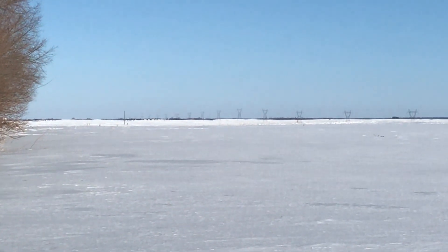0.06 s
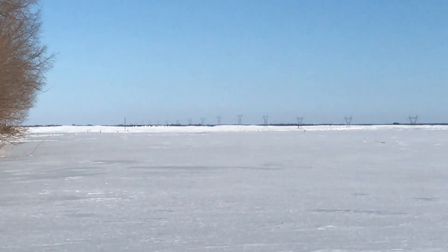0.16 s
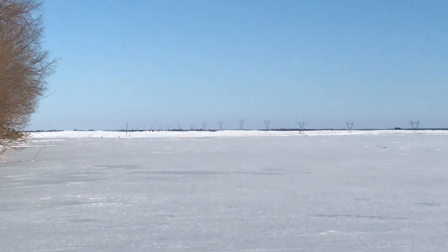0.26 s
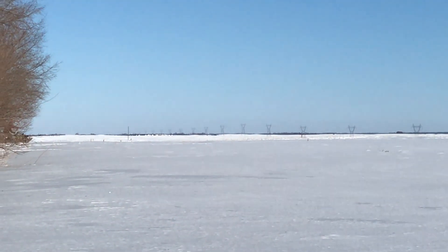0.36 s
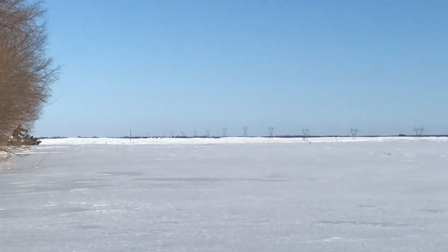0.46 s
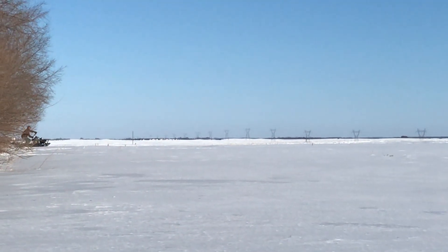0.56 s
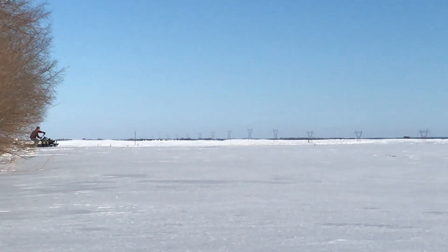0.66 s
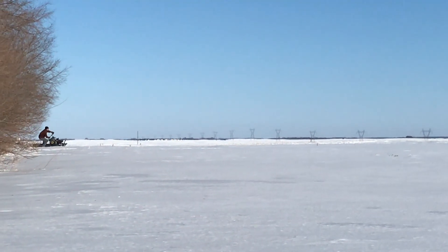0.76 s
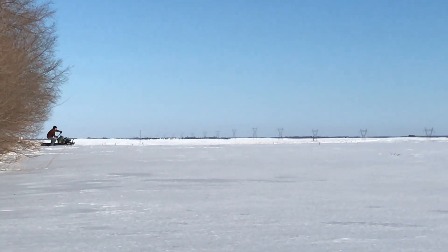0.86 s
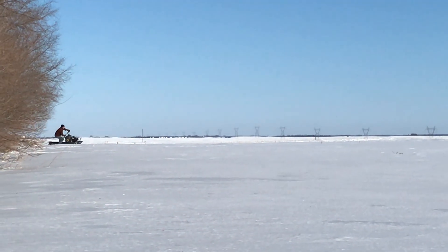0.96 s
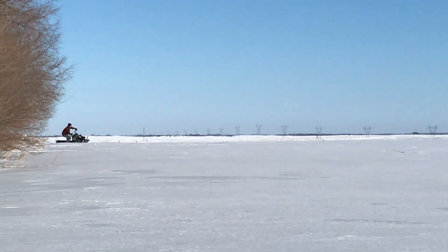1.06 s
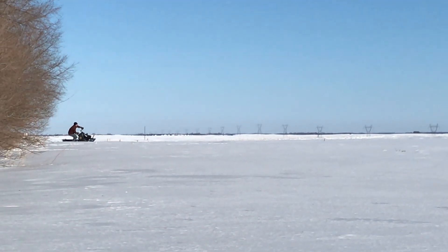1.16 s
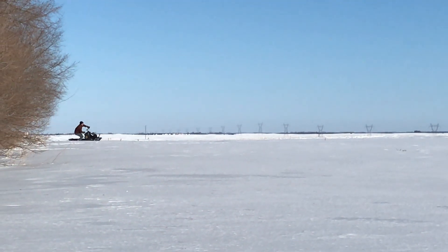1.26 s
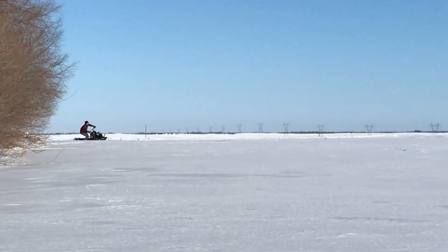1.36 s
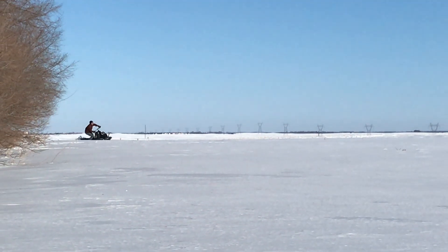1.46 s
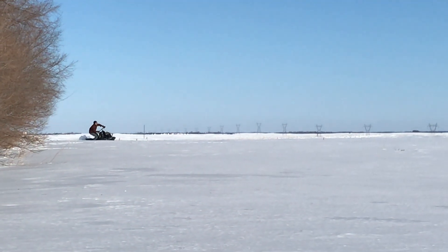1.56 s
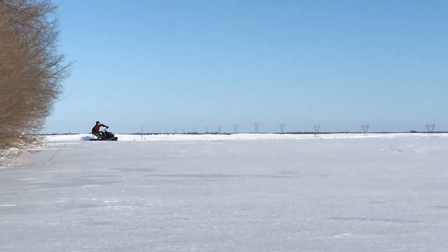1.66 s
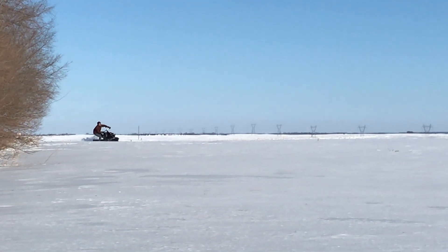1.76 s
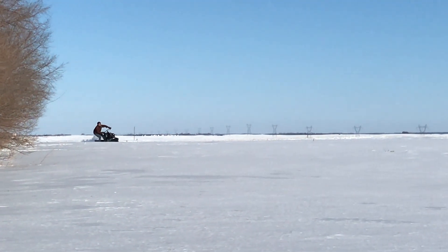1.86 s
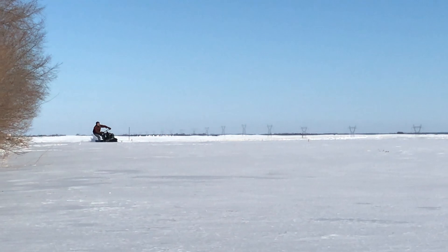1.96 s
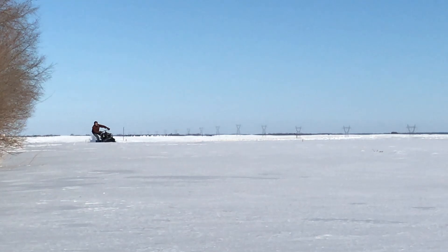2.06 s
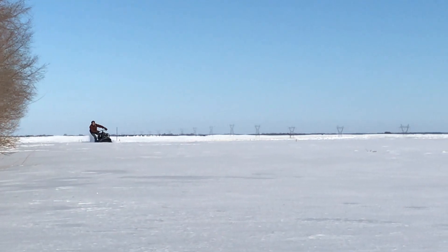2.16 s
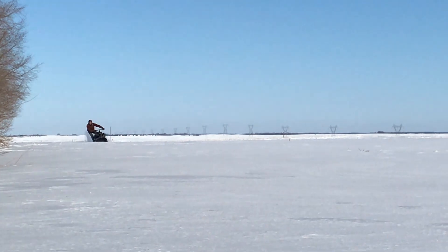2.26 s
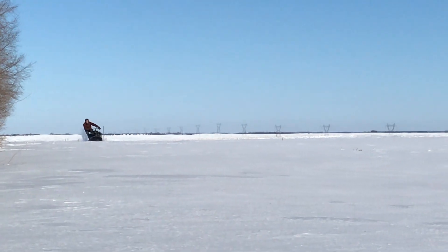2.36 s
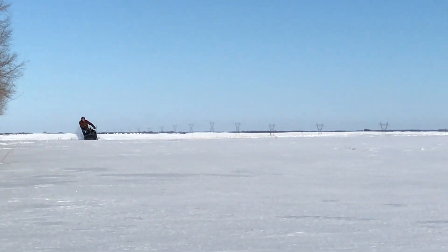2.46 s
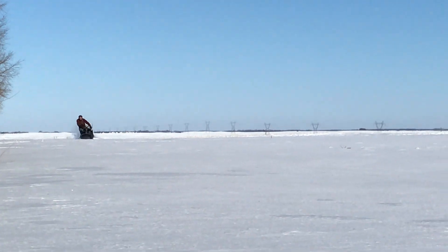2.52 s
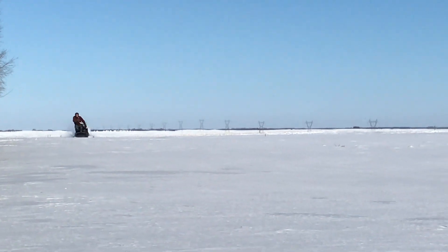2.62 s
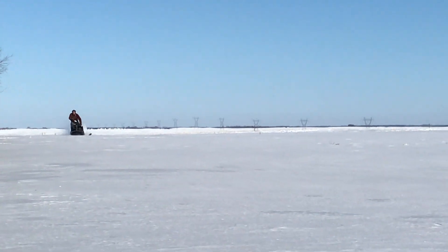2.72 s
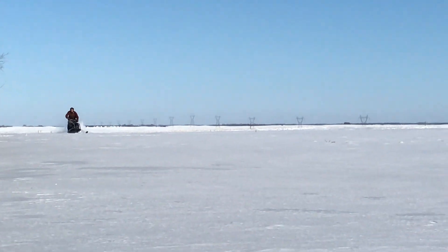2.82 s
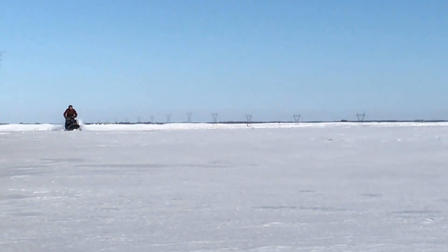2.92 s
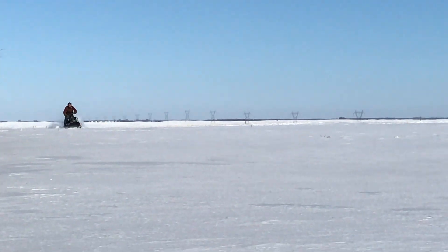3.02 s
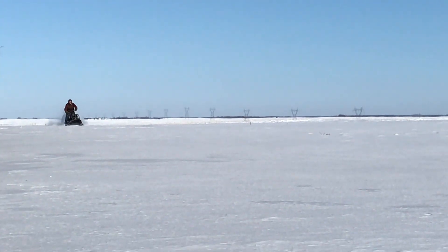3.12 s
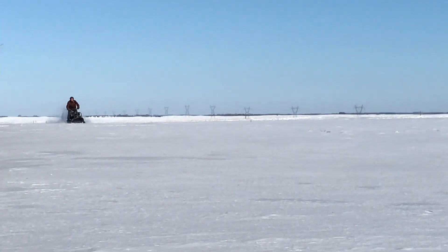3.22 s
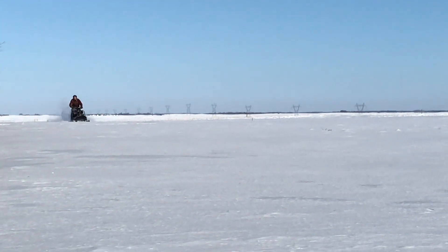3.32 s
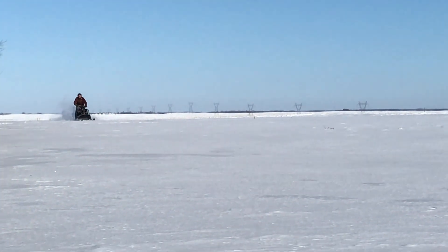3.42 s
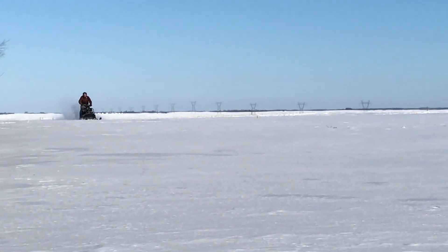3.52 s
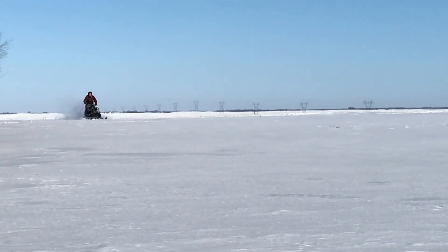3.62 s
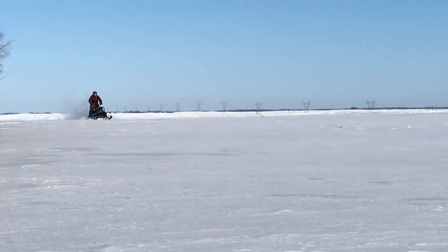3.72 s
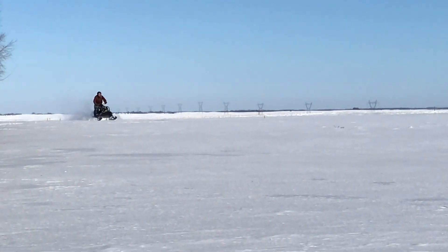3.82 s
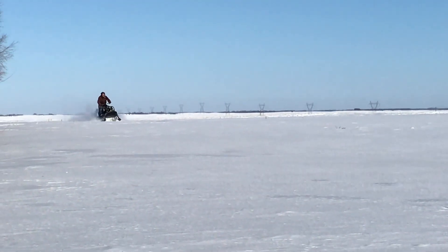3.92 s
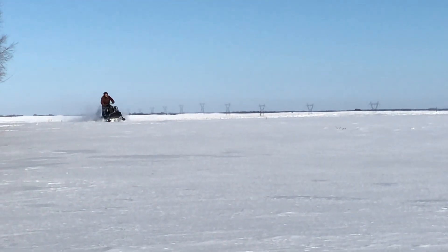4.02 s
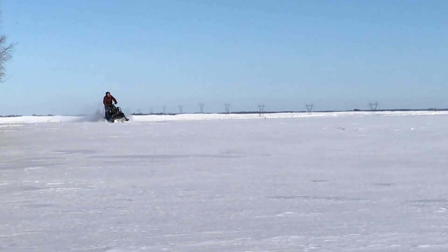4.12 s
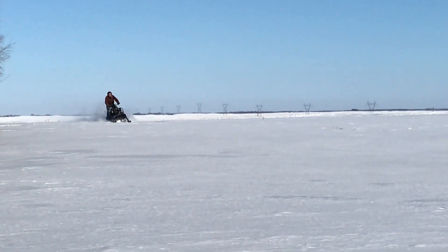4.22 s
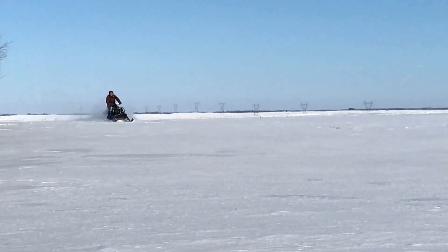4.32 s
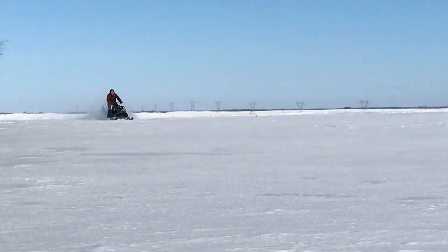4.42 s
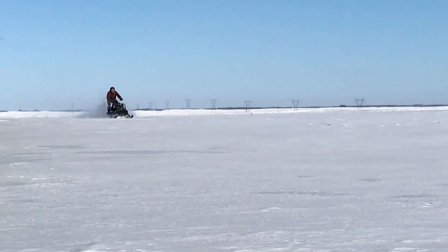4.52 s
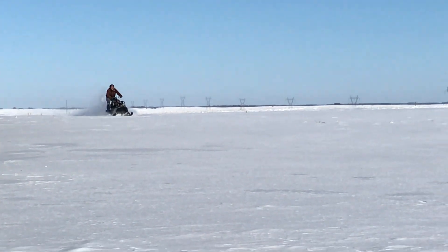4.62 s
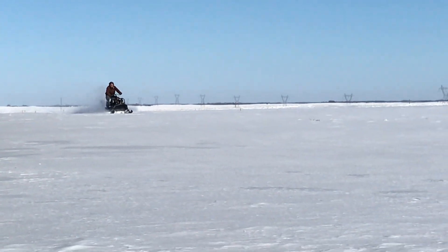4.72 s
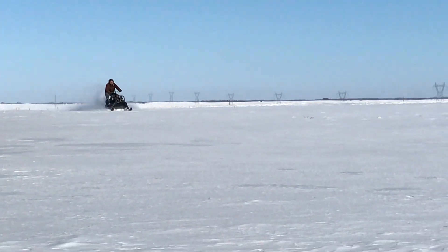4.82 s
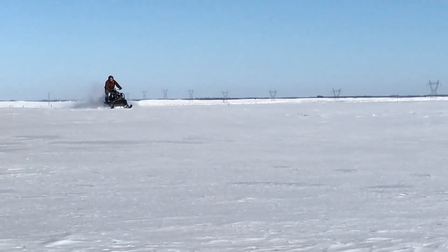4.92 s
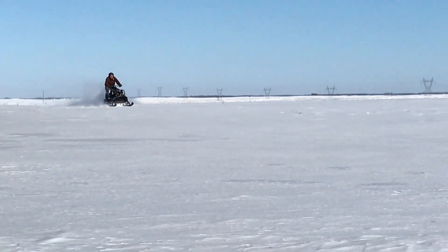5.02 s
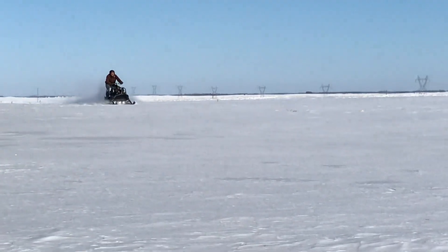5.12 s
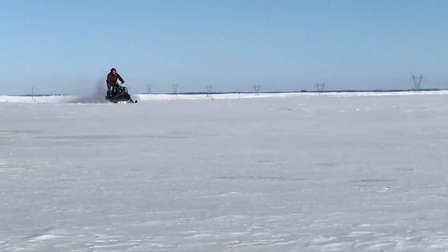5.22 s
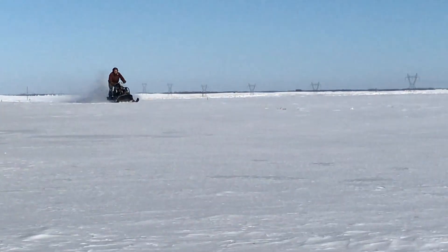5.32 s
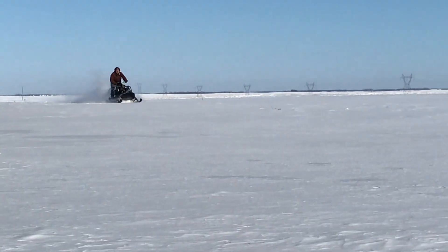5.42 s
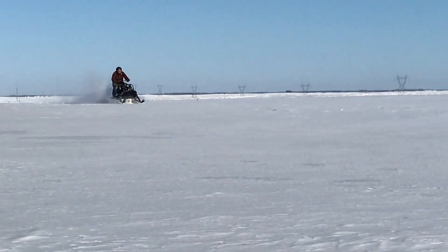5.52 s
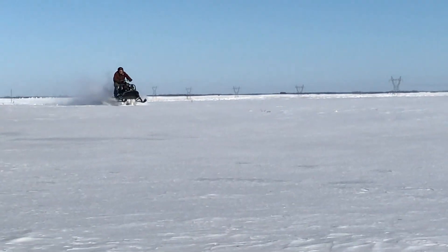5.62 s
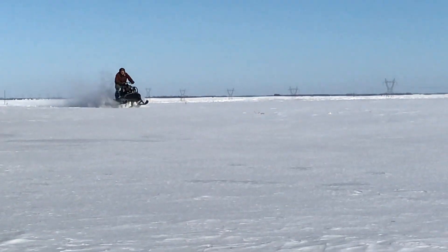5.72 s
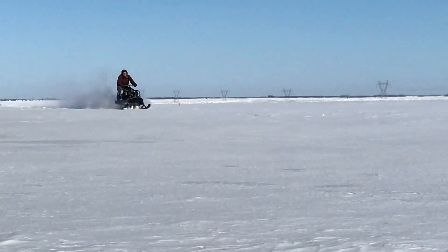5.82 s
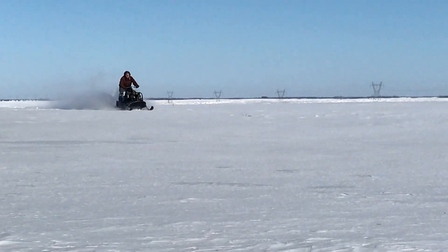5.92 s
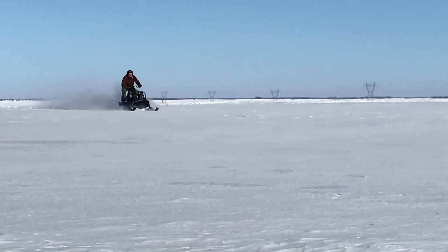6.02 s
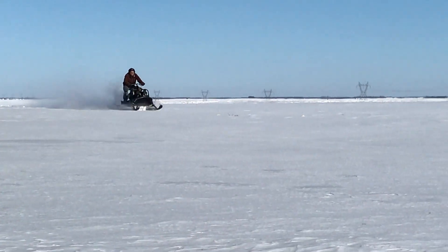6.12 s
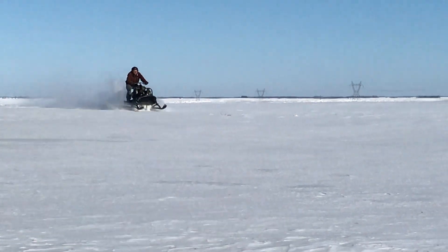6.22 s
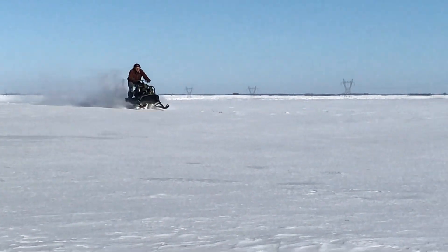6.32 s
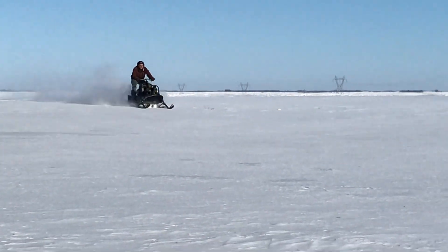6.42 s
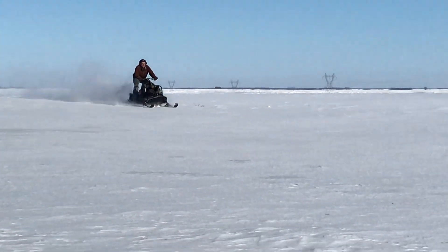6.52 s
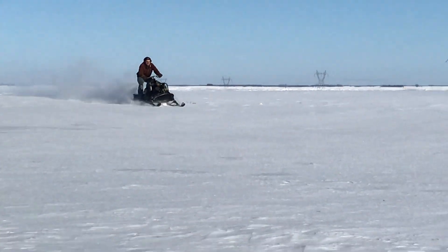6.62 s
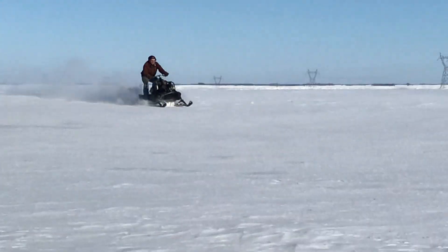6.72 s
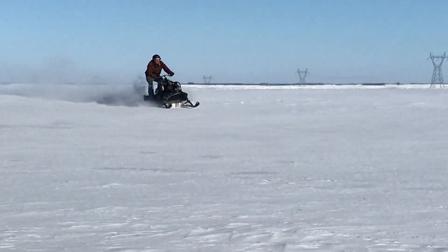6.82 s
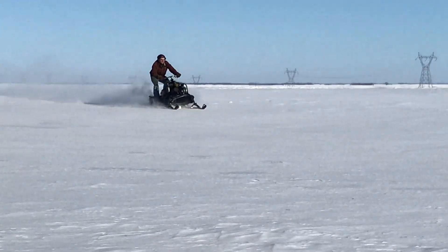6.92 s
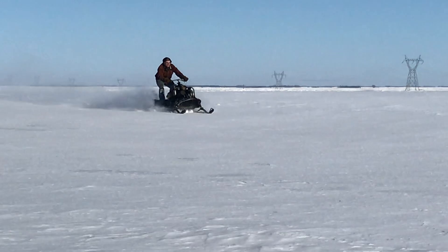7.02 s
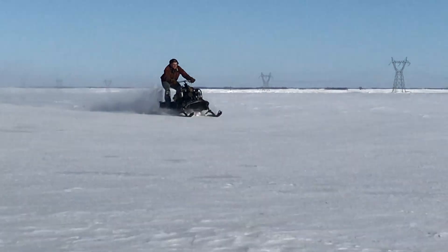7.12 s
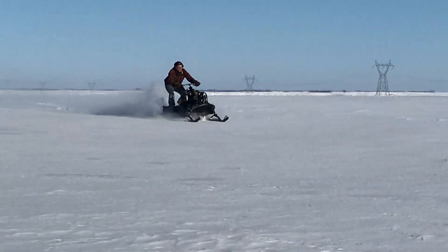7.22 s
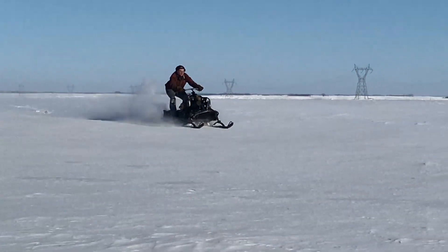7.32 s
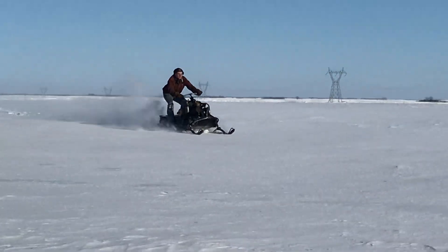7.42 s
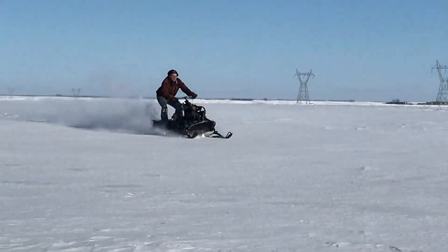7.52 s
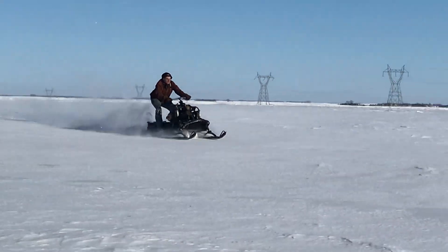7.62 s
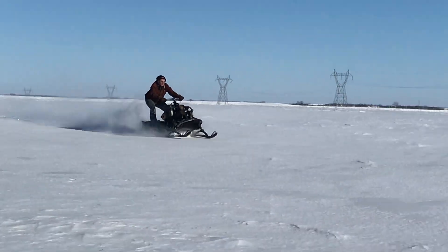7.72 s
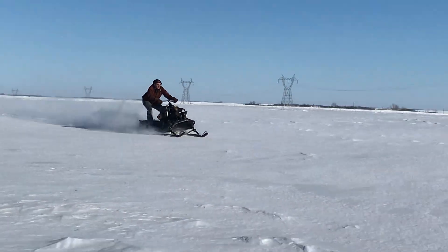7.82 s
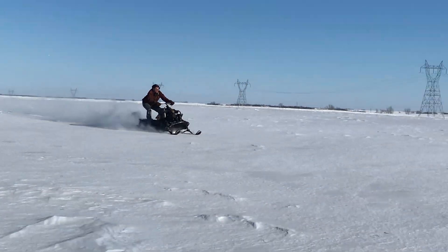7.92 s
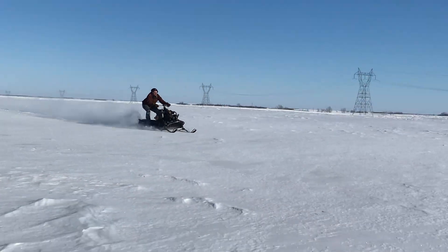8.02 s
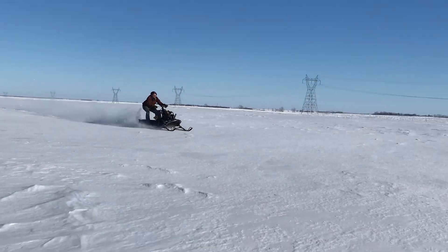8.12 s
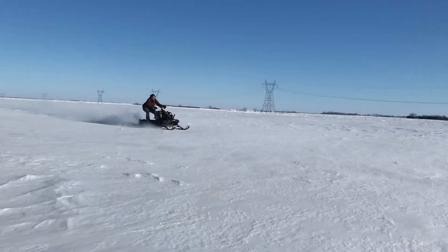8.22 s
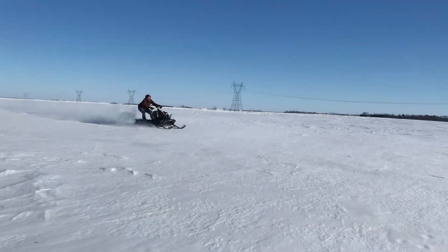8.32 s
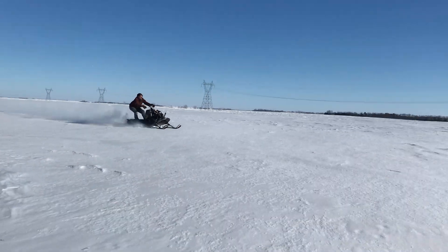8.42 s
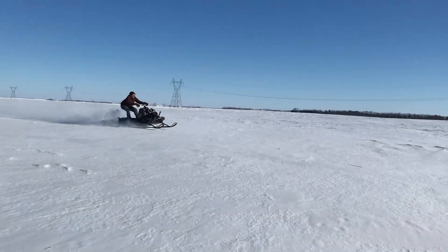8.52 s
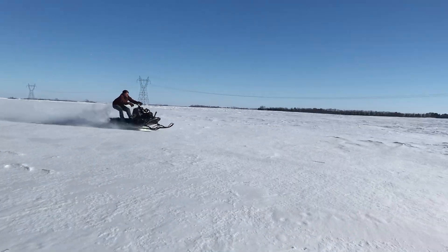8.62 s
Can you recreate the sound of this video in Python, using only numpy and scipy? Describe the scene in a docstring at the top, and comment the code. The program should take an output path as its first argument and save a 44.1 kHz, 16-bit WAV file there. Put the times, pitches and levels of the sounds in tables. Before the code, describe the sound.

Far-off snowmobile engine putters unevenly, revs into a buzzing drone, then swells steadily nearer to a harsh, bright two-stroke roar outdoors.

```python
"""Snowmobile sweeping closer

A twin-cylinder two-stroke snowmobile chugs far off on a snowy field, pulls away and sweeps closer.
Exhaust pulses and blown gas ring the pipe and hood; at full throttle one firing in four nearly drops out.
Sine tones carry the low drone and swelling overtones; short noise bursts make the chugs, pings and ticks.
A small mono microphone hears it in the open, over a faint breeze of filtered noise."""
import sys
import numpy as np
from scipy import signal
from scipy.fft import rfft, irfft
from scipy.io import wavfile
from scipy.ndimage import uniform_filter1d

SR = 44100
rng = np.random.default_rng(int(sys.argv[2]) if len(sys.argv) > 2 else 0)


def file_out(sig):
    """Save sig as 16-bit WAV at sys.argv[1]."""
    # one column per channel
    cols = np.atleast_2d(sig).T
    # limit, then scale
    lim = np.clip(cols, -1, 1)
    pcm = np.round(lim * 32767).astype(np.int16)
    wavfile.write(sys.argv[1], SR, pcm)


N = 381906
T = np.arange(N) / SR


def amp(db):
    """Turns decibels into a linear gain."""
    return 10 ** (np.asarray(db) / 20)


def evened(x):
    """Scales the whole signal to rms 1."""
    return x / np.sqrt(np.mean(x ** 2) + 1e-20)


def steadied(x):
    """Divides out slow changes of level."""
    return x / np.sqrt(uniform_filter1d(x ** 2, 8192) + 1e-9)


def curves(rows):
    """Joins table rows by straight lines, one array a column."""
    s, *columns = np.transpose(rows)
    return [np.interp(T, s, column) for column in columns]


def read(points, hz):
    """Reads a spectrum table at the given pitches, along a log pitch axis."""
    f, value = np.transpose(points)
    return np.interp(np.log(hz + 1), np.log(f + 1), value)


def wander(hz):
    """Slow chance of rms 1, up to about hz."""
    rolloff = 1 + (np.fft.rfftfreq(N, 1 / SR) / hz) ** 4
    return evened(irfft(rfft(rng.standard_normal(N)) / rolloff, N))


def clicks(s, size):
    """An impulse of the given size at each time."""
    out = np.zeros(N + SR)
    np.add.at(out, np.round(np.asarray(s) * SR).astype(int), size)
    return out[:N]


def puffed(train, rise_s, fall_s):
    """Each impulse becomes a quick swell that dies away."""
    t = T[:4096]
    swell = (1 - np.exp(-t / rise_s)) * np.exp(-t / fall_s)
    return signal.oaconvolve(train, swell)[:N]


def twice_peaked(x, hz, width_hz):
    """One resonance passed twice, for steeper sides."""
    b, a = signal.iirpeak(hz, hz / width_hz, fs=SR)
    return signal.lfilter(b, a, signal.lfilter(b, a, x))


def ring(x, hz, width_hz):
    """One steep resonance at a steady level of 1."""
    return steadied(twice_peaked(evened(x), hz, width_hz))


# broad spectrum between the rings: (pitch_hz, relative density_db per Hz)
BLAST_SPECTRUM = [(220, -47), (380, -11.5), (1220, -8.5), (1360, -1.5), (1590, -4), (1850, -7),
                  (2530, -4.5), (3500, 3.5), (3850, 1), (4220, 2), (5170, -1.5), (6230, -9), (7160, -18),
                  (10400, -24.5), (15600, -28.5)]


def through_pipe(x, rings, ring_db):
    """Causal filter: narrow rings standing over the broad blast."""
    hz = np.fft.rfftfreq(8192, 1 / SR)
    power = amp(read(BLAST_SPECTRUM, hz)) ** 2
    for f, width_hz, db in rings:
        power = power + amp(db + ring_db) ** 2 / (1 + (2 * (hz - f) / width_hz) ** 2) ** 2
    log_gain = np.log(np.r_[power, power[-2:0:-1]]) / 2
    # minimum phase: no ringing ahead of the pulse
    minimum_phase = np.exp(np.conj(signal.hilbert(log_gain)))
    taps = np.fft.ifft(minimum_phase).real[:4096]
    return evened(signal.oaconvolve(x, taps)[:N])


# lower edges of growl, howl, rasp, fizz and top: (edge_hz)
BAND_FLOORS_HZ = [400, 1000, 2800, 7000, 10300]


def bands(x):
    """Splits x at the band edges with soft crossovers; each part keeps a steady level of 1."""
    hz = np.fft.rfftfreq(N, 1 / SR)
    above = [1 / (1 + (edge / (hz + 1)) ** 12) for edge in BAND_FLOORS_HZ] + [0]
    spectrum = rfft(x)
    return [steadied(irfft(spectrum * (a - b), N)) for a, b in zip(above, above[1:])]


def scattered(pulses, spread_s, drift_hz, count):
    """Hood, rider and snow smear each pulse into a cluster that drifts, at steady strength, as the sled moves."""
    t, out = T[:600], 0
    weights = np.array([wander(drift_hz) for _ in range(count)])
    steady_weights = weights * np.sqrt(count / ((weights ** 2).sum(axis=0) + .1))
    for weight in steady_weights:
        cluster = rng.standard_normal(len(t)) * np.exp(-t / spread_s)
        out = out + weight * signal.oaconvolve(pulses, cluster / np.linalg.norm(cluster))[:N]
    return out


PATCH_DB, PATCH_HZ, PATCH_S, PATCH_FROM_HZ = 2.0, 900, .08, 6500


def patchy(x):
    """The treble shimmers: random patches of pitch and time grow louder or softer."""
    hz, _, z = signal.stft(x, SR, nperseg=512, noverlap=384)
    bins = max(round(PATCH_HZ * 512 / SR), 1)
    frames = max(round(PATCH_S * SR / 128), 1)
    field = rng.standard_normal(z.shape)
    for _ in range(2):
        field = uniform_filter1d(uniform_filter1d(field, bins, axis=0), frames, axis=1)
    depth_db = PATCH_DB * hz ** 2 / (hz ** 2 + PATCH_FROM_HZ ** 2)
    gain = amp(depth_db[:, None] * evened(field))
    return signal.istft(z * gain, SR, nperseg=512, noverlap=384)[1][:N]


# strength of each firing in the cycle when the dropout is at full depth: (level_db)
FOUR_FIRINGS_DB = [0, 2.5, -1, -14]
CYCLE = len(FOUR_FIRINGS_DB)
# ringing of pipe and hood when close: (pitch_hz, width_hz, relative level_db)
PIPE_NEAR = [(723, 4, -5), (1000, 32, -3), (1224, 21, 0), (1838, 137, 0.5), (2110, 300, -4.5),
             (2680, 160, -9.5), (2430, 87, -6.5), (4280, 330, 8), (5004, 190, 9), (5350, 590, 3),
             (7050, 290, -10.5), (11800, 200, -32)]
# ringing of pipe and hood, side on: (pitch_hz, width_hz, relative level_db)
PIPE_FAR = [(852, 105, -3), (1125, 63, -7.5), (1828, 97, -4), (2220, 89, 2), (2626, 46, -1),
            (2640, 150, -0.5), (3360, 200, 0.5), (4150, 200, 5.5), (4570, 210, 6), (3600, 480, -8),
            (8810, 1340, -24)]
# two rings that swing in and out: (pitch_hz, width_hz, clean pulse share 0-1)
TURNING_RINGS = [(1384, 49, 0.91), (3570, 280, 0.92)]
# each pulse returns from the pipe's end, more so at full throttle
PIPE_ECHO_S, PIPE_ECHO, PIPE_ECHO_LOADED = .002865, 0.66, 0.077
# the firing (0-3) that cracks hardest, and its extra snap in the blast and in the high ring
STRONG_PLACE, STRONG_CRACK, STRONG_CRACK_RING = 1, 1.0, 10.0
CLEANER_LOADED = .2  # the pulses sharpen at full throttle


def exhaust(turns, chugging, dropped, clean, near, bands_db, rings_db):
    """A sharp pulse and a puff of gas at every firing, rung through the pipe."""
    at = np.flatnonzero(np.diff(np.floor(turns))) + 1
    late, size = rng.standard_normal((len(at), 2)).T
    place = np.floor(turns[at]).astype(int) % CYCLE
    strength = amp(dropped[at] * np.array(FOUR_FIRINGS_DB)[place] + 0.32 * size)
    s = at / SR + 1.2e-5 * late
    echo = (PIPE_ECHO + PIPE_ECHO_LOADED * dropped[at]) * strength
    firings = clicks(s, strength) + clicks(s + PIPE_ECHO_S, echo)
    gas = (0.023 + evened(puffed(firings, 0.0012, 0.0028))) * rng.standard_normal(N)
    pulses = firings + 0.52 * scattered(firings, 0.0024, 5.0, count=3)

    # around a dropped firing each of the four burns in its own, repeating way
    for k in range(CYCLE):
        own_firings = clicks(s, strength * (place == k))
        pulses += 0.55 * dropped * scattered(own_firings, 0.0024, 1.5, count=2)

    crack = clicks(s, dropped[at] * strength * (place == STRONG_PLACE))
    pulses, cracks = pulses + STRONG_CRACK * crack, pulses + STRONG_CRACK_RING * crack
    out = 0
    for db, drive, (hz, width_hz, share) in zip(rings_db, [pulses, cracks], TURNING_RINGS):
        clean_ring = np.sqrt(min(share, 1)) * ring(drive, hz, width_hz)
        gas_ring = np.sqrt(max(1 - share, 0)) * ring(gas, hz, width_hz)
        out = out + amp(db - 6.5) * (clean_ring + gas_ring)

    near = np.clip(near, 0, 1)
    near_gain, far_gain = np.sqrt(near), np.sqrt(1 - near)
    pulses = near_gain * through_pipe(pulses, PIPE_NEAR, 8.0) + far_gain * through_pipe(pulses, PIPE_FAR, 5.0)
    gas = near_gain * through_pipe(gas, PIPE_NEAR, 0.21) + far_gain * through_pipe(gas, PIPE_FAR, 0.38)

    # the mix of clean pulse and gas differs by band, gassiest at the top; each level wavers slightly at random
    keeps = [0.75, 1.0, 1.15, 0.6, 0.5]
    for pulse, hiss, db, keep in zip(bands(pulses), bands(gas), bands_db, keeps):
        share = np.clip((clean + CLEANER_LOADED * dropped) * keep, 0, 1)
        mix = np.sqrt(share) * pulse + np.sqrt(1 - share) * hiss
        out = out + amp(db + 0.51 * wander(3.4)) * mix
    return patchy(out) * np.sqrt(np.clip(1 - chugging, 0, 1))


# tones of the four-firing cycle: (multiple of the cycle rate, relative level_db)
SKIP_ORDERS = [(1, -10), (2, -4.5), (3, -5), (5, -12.5), (6, -15.5)]
# level flutter of firing tone, 2nd and 3rd multiple, the last two stronger: (rms depth_db)
BEAT_DB = [-0.05, 1.3, -1]
BEAT_HZ = 13
QUARTERS_DB, QUARTERS_FOLLOW = -11, 0.77  # the quarter orders grow more slowly than the firing tone
THIRD_DB, THIRD_RISES_DB = -17, 3  # 3rd multiple against the firing tone, and its rise at full nearness


def drone(turns, dropped, running, near, tone_db, second_db):
    """Low orders as clean tones; the dropped firing adds quarter orders."""
    levels_db = [tone_db, second_db, tone_db + THIRD_DB + THIRD_RISES_DB * near]
    tones = 0
    for multiple, (db, beat_db) in enumerate(zip(levels_db, BEAT_DB), start=1):
        tones = tones + amp(db + beat_db * wander(BEAT_HZ)) * np.sin(2 * np.pi * multiple * turns)
    cycle = turns / CYCLE
    quarters = 0
    for k, db in SKIP_ORDERS:
        quarters = quarters + amp(db) * np.sin(2 * np.pi * (k * cycle + rng.random()))
    quarters_gain = amp(QUARTERS_FOLLOW * tone_db + QUARTERS_DB) * np.clip(5 * dropped, 0, 1)
    return np.sqrt(2) * tones * running + quarters_gain * evened(quarters)


# spectrum of the rumble: (pitch_hz, relative density_db per Hz)
BREEZE_SPECTRUM = [(12, -50), (20, -5.5), (108, -7), (155, -6), (211, -10), (308, -12), (387, -15),
                   (500, -41), (650, -3), (1100, -120)]
BREEZE_DB = -70


def breeze(growl_db):
    """Low lumpy rumble of wind and track on snow, as filtered noise; it grows as the sled nears."""
    hz = np.fft.rfftfreq(N, 1 / SR)
    z = rfft(rng.standard_normal(N)) * amp(read(BREEZE_SPECTRUM, hz))
    z[hz > 520] = 0
    wind, track = amp(BREEZE_DB + 2.0 * wander(5.2)), amp(growl_db - 4.5)
    return evened(irfft(z, N)) * (wind + track)


# low throb while chugging: (start_s, level_db of the 3rd multiple of the chug rate, base level_db of the others)
THROB = [(0, -62, -57), (.06, -55, -58), (.21, -55, -61), (.43, -57, -59.5), (.54, -52, -56),
         (.6, -56, -62), (.7, -53, -69), (.76, -56, -70), (.9, -64, -59), (1.07, -55, -56.5),
         (1.2, -55, -54), (1.41, -48.5, -62), (1.5, -67, -66)]
# the other multiples of the chug rate: (multiple)
THROB_ORDERS = [4, 5, 8, 12]
# their offsets from the base level: (level_db)
THROB_ORDERS_DB = [-1.5, -4.5, -10.5, -15]
THROB_FLUTTER_DB, THROB_END_S = 2.5, 1.6


def throb(turns):
    """While the engine chugs once in four firings, the pipe hums on multiples of the chug rate."""
    third_db, rest_db = curves(THROB)
    cycle = turns / CYCLE
    hum = amp(third_db) * np.sin(2 * np.pi * 3 * cycle)
    for k, db in zip(THROB_ORDERS, THROB_ORDERS_DB):
        level = amp(rest_db + db + THROB_FLUTTER_DB * wander(5.3))
        hum += level * np.sin(2 * np.pi * (k * cycle + rng.random()))
    return np.sqrt(2) * hum * np.clip((THROB_END_S - T) / 0.051, 0, 1)


# single chugs at low speed: (start_s, rattle level_db before trim, brightness_db against the rattle before trim)
CHUGS = [(0.0185, -33.5, -18), (0.058, -30, -19), (0.098, -34, -18), (0.1391, -41, -5), (0.192, -32, -16),
         (0.2418, -40, -12), (0.277, -36, -9), (0.3177, -34, -14), (0.3466, -42, -8), (0.3875, -32, -17),
         (0.4264, -33, -19), (0.457, -36, -14), (0.531, -32, -15), (0.5686, -37, -12), (0.622, -26.5, -29),
         (0.764, -31, -20.5), (0.7906, -40, -18), (0.8795, -40, -12), (0.9163, -47, -11),
         (0.9527, -35, -18), (1, -34, -18), (1.037, -31.5, -14), (1.0949, -30, -16), (1.141, -30.5, -17),
         (1.1847, -36.5, -12), (1.2311, -36.5, -11), (1.2825, -35.5, -13), (1.3234, -41, -8),
         (1.365, -37, -12), (1.4032, -37, -11), (1.4411, -38, -13), (1.4666, -44, -7)]
# hood at low speed: (pitch_hz, width_hz, relative level_db)
HOOD_RATTLE = [(1330, 290, 11), (1610, 130, 14.5), (2310, 170, 5), (3140, 490, 2), (3750, 490, -6),
               (4400, 330, -4), (5460, 500, -23), (6400, 370, -28)]
SECOND_CHUG_S, SECOND_CHUG = 0.0088, 0.25  # delay and typical strength of the weaker firing behind each chug


def chugs():
    """Each slow firing, and the weaker one behind it, rattles the hood for a few hundredths of a second."""
    s, rattle_db, bright_db = np.transpose(CHUGS)
    _, howl, rasp, fizz, top = bands(through_pipe(rng.standard_normal(N), HOOD_RATTLE, 12.6))
    second = SECOND_CHUG * amp(3.1 * rng.standard_normal(len(s)))

    def pair(db):
        """A firing and its follower."""
        return clicks(s, amp(db)) + clicks(s + SECOND_CHUG_S, second * amp(db))

    dull = puffed(pair(rattle_db - 19.0), 0.0005, 0.024) * howl
    treble = rasp + 0.35 * fizz + 0.35 * top
    bright = puffed(pair(rattle_db + bright_db - 5.0), 0.00096, 0.011) * treble
    return patchy(dull + bright)


# chugs that ping in the hood: (start_s, pitch_hz, level_db before the fade shape)
PINGS = [(.022, 3900, -47), (.063, 3700, -45), (.1, 3800, -51), (.142, 4630, -54), (.205, 3160, -42),
         (.242, 3380, -44), (.282, 3300, -39), (0.321, 3130, -39), (.497, 3530, -49), (.535, 3300, -51),
         (.572, 3300, -49), (.628, 3300, -57), (.955, 3000, -57), (1.002, 3600, -50), (1.04, 3530, -51),
         (1.1, 3520, -51), (1.145, 3300, -52), (1.194, 2320, -45)]
PING_WIDTH_HZ, PING_FALL_S = 370, 0.0064


def pings():
    """The hood pings as a short noisy ring around each pitch."""
    out, t = np.zeros(N), T[:2000]
    shape = np.minimum(t / 0.0018, 1) * np.exp(-t / PING_FALL_S)
    for s, hz, db in PINGS:
        noise = evened(twice_peaked(rng.standard_normal(len(t)), hz, PING_WIDTH_HZ))
        out += signal.oaconvolve(clicks([s], amp(db)), noise * shape)[:N]
    return out


# overtones that sing out for a while: (start_s, length_s, multiple of the firing rate, level_db before flutter)
SWELLS = [(1.41, 1.7, 3, -66.5), (1.62, 0.12, 18, -49.5), (1.643, 0.17, 15, -53), (1.75, 0.3, 12, -52.5),
          (1.874, 0.11, 16, -49), (1.97, 0.53, 11, -51.5), (2.17, 0.37, 16, -51.5),
          (2.406, 0.46, 14, -52.5), (2.68, 0.67, 9, -55), (2.72, 0.24, 14, -49), (2.74, 0.58, 12, -49),
          (2.456, .22, 12, -51.5), (1.66, 0.13, 29, -57), (1.66, 0.18, 32, -64), (3.24, 0.4, 15, -51.5),
          (3.26, 0.18, 19, -54), (3.3, 0.35, 12, -54), (4.45, 0.54, 10, -45), (4.5, 1.4, 11, -48),
          (5.72, 0.32, 10, -39), (6.75, 4.9, 7, -37), (7.7, 1.1, 24, -28.5), (7.803, 0.41, 10, -29.5),
          (8.3, 0.63, 16, -31), (7.685, 0.43, 8, -46), (8.448, .4, 8, -41)]
SWELL_THROB, SWELL_WAVER = .6, .7  # dip at the dropped firing (0-1); phase waver at the 12th multiple (radians rms)


def swells(turns, dropped):
    """Each swell is a multiple of the firing rate that rises, wavers and sinks."""
    out, waver = np.zeros(N), SWELL_WAVER * wander(14)
    for start, length, multiple, db in SWELLS:
        on = slice(round(start * SR), round((start + length) * SR))
        arch = np.sin(np.pi * np.clip((T[on] - start) / length, 0, 1)) ** 0.38
        phase = 2 * np.pi * (multiple * turns[on] + rng.random()) + waver[on] * multiple / 12
        out[on] += amp(db) * arch * np.sin(phase)
    cycle_swing = np.cos(2 * np.pi * (turns - STRONG_PLACE - .5) / CYCLE)
    beat = 1 + SWELL_THROB * np.clip(dropped, 0, 1) * cycle_swing
    return np.sqrt(2) * out * beat * amp(2.0 * wander(10))


KNOCK_S, KNOCK_DB, KNOCK_WIDTH_S = 1.5039, -34, .00035


def knock():
    """One dull knock as the engine picks up: a single inward push of air with small rebounds."""
    u = (T - KNOCK_S) / KNOCK_WIDTH_S
    return -amp(KNOCK_DB) * (1 - 0.55 * u ** 2) * np.exp(-u ** 2 / 2)


# dry ticks nearby: (start_s, level_db before halving and decay, pitch_hz)
TICKS = [(2.791, -34, 10000), (3.4, -36, 9000), (3.71, -36, 9000)]


def ticks():
    """Short dry clicks, each a wide noise burst around its pitch."""
    out, t = np.zeros(N), T[:400]
    for s, db, hz in TICKS:
        b, a = signal.butter(1, [hz / 2, min(hz * 1.2, 16000)], "band", fs=SR)
        burst = evened(signal.lfilter(b, a, rng.standard_normal(len(t))))
        out += signal.oaconvolve(clicks([s], amp(db)), burst * np.exp(-t / 0.0039) / 2)[:N]
    return out


# engine speed before jitter: (start_s, firings per s)
SPEED = [(0, 100), (.3, 102), (.45, 90), (.72, 116), (.9, 84.7), (1.07, 85.6), (1.2, 90.7), (1.41, 104.6),
         (1.5, 115), (1.64, 133.5), (1.81, 150.4), (1.93, 158), (2.03, 162), (2.22, 163.8), (2.56, 157.9),
         (2.87, 151.7), (3.08, 153.1), (3.29, 146.3), (3.52, 145), (3.64, 140.5), (3.84, 144),
         (4.08, 157.4), (4.22, 158.9), (4.39, 167), (4.65, 165.4), (5.02, 169.4), (5.31, 168.3),
         (5.46, 174.1), (5.62, 169.6), (5.74, 169.6), (5.91, 177.6), (6.08, 170.8), (6.29, 165.4),
         (6.4, 169.4), (6.55, 171.2), (6.63, 167.4), (6.8, 165.1), (7.04, 168.5), (7.38, 170), (7.65, 173),
         (7.77, 171.3), (7.98, 174.5), (8.26, 175.3), (8.51, 175), (8.56, 172.7), (8.66, 172.2)]
# the low end: (start_s, firing tone level_db, 2nd multiple level_db)
TONE = [(0, -55.5, -65), (.9, -54.5, -56), (1.47, -49.5, -60.5), (1.75, -50, -56), (2.7, -51, -51),
        (2.9, -51, -56.5), (3.3, -47.5, -59.5), (3.75, -46, -57), (4.1, -45.5, -54.5), (4.5, -47, -65.5),
        (4.85, -46.5, -52.5), (5.1, -45.5, -52.5), (5.7, -43.5, -51.5), (6.5, -42, -52.5),
        (7.4, -36.5, -44.5), (8.1, -31, -40.5), (8.5, -28.5, -37), (8.66, -28.5, -36.5)]
# exhaust: (start_s, howl 1-2.8 kHz level_db, rasp 2.8-7 kHz level_db, fizz 7-10.3 kHz level_db before trim)
ENGINE = [(0, -56.5, -70, -78), (.21, -49.5, -66, -69), (.53, -48, -64, -68), (.74, -55, -74, -75),
          (1.1, -66, -72, -75), (1.3, -63, -66.5, -74), (1.7, -46, -50.5, -58), (2.4, -46, -51.5, -57.5),
          (2.97, -47.5, -54.5, -57.5), (3.37, -47.5, -49.5, -56.5), (3.66, -47.5, -51, -56),
          (3.95, -42.5, -45, -48.5), (4.25, -40, -42, -46.5), (4.68, -36.5, -45, -46.5),
          (4.94, -36, -39.5, -38.5), (5.19, -35.5, -41, -48.5), (5.3, -34, -40, -39), (5.6, -35, -39, -42),
          (5.74, -31, -33.5, -36), (5.89, -29, -27, -30), (6.04, -32.5, -36.5, -33), (6.3, -27, -27, -32),
          (6.6, -27, -26, -26.5), (6.92, -27, -26, -26.5), (7.3, -25, -24, -26), (7.5, -27, -23, -26),
          (7.96, -23.5, -20, -31), (8.2, -22.5, -21, -26), (8.66, -21, -21, -32)]
# exhaust over 10.3 kHz: (start_s, level_db)
TOP = [(0.0, -81), (0.12, -71), (0.87, -75), (1.88, -61), (3.57, -58), (4.36, -50.5), (4.51, -50.5),
       (4.92, -47), (5.19, -52), (5.45, -45), (5.59, -44.5), (5.91, -28), (6.0, -39), (6.08, -34),
       (6.39, -39), (6.46, -35), (6.59, -33.5), (7.04, -30), (7.28, -28.5), (7.45, -43), (7.5, -32.5),
       (7.69, -34.5), (7.84, -32.5), (8.25, -33.5), (8.34, -34), (8.66, -28.5)]
# two pipe rings swing as the sled turns: (start_s, low ring level_db, high ring level_db, both before trim)
TURNING = [(0, -52, -76), (1.5, -56, -59), (2, -65, -51), (2.9, -76, -64), (3.7, -53, -61),
           (4.25, -42, -43), (4.4, -38, -50), (5.3, -36, -39.5), (5.48, -39.5, -53), (5.65, -30, -49),
           (6.1, -35.5, -41), (6.55, -29.5, -47), (7.1, -34, -35), (7.4, -25.5, -41), (7.75, -29, -26),
           (7.9, -41, -19.5), (8.1, -18.5, -27), (8.45, -28, -16.5), (8.66, -34, -18)]
# throttle and position: (start_s, chugging share 0-1, depth of the dropped firing 0-1,
# base share of clean pulses 0-1, nearness 0-1)
STATE = [(0, 0, 0.18, 0.2, 0.9), (.6, 0.59, 0.03, 0.2, 1), (.75, 0.72, 0.07, 0.2, 1),
         (1.3, 0.28, 0.08, 0.1, 0.5), (1.5, 0.1, 0, 0.1, 0.1), (1.7, 0.21, 0.07, 0.44, 0),
         (2.1, 0.13, 0.06, 0.5, 0.2), (2.5, 0.13, 0.03, 0.7, 0.26), (3, 0.15, 0.05, 0.44, 0.07),
         (3.7, 0.13, 0.06, 0.47, 0), (4.24, 0, 0.01, 0.44, 0.25), (4.31, 0.07, 0.3, 0.3, 0.3),
         (5.5, 0.09, 0.21, 0.26, 0.85), (5.8, 0.03, 0.6, 0.35, 0.65), (6.1, 0.06, 0.41, 0.38, 0.76),
         (6.5, 0.09, 0.7, 0.37, 0.75), (7.3, 0.1, 0.69, 0.46, 0.92), (8.66, 0.07, 0.49, 0.3, 0.55)]
GROWL_DB = -7.5  # 400-1000 Hz band against the firing tone, before the lean below
GROWL_FOLLOWS_HOWL, GROWL_HOWL_DB = 0.13, -18.5  # that band leans partly on the howl


def scene():
    """One running engine phase drives every tonal and pulsed exhaust layer; the rest is placed in time."""
    rate, = curves(SPEED)
    tone_db, second_db = curves(TONE)
    howl_db, rasp_db, fizz_db = curves(ENGINE)
    growl_from_howl_db = GROWL_FOLLOWS_HOWL * (howl_db + GROWL_HOWL_DB)
    growl_db = growl_from_howl_db + (1 - GROWL_FOLLOWS_HOWL) * (tone_db + GROWL_DB)
    rings_db, (top_db,) = curves(TURNING), curves(TOP)
    chugging, dropped, clean, near = curves(STATE)

    # turns counts firings, from 2.9 into the four-firing cycle
    turns = 2.9 + np.cumsum(rate * (1 + .0015 * wander(24))) / SR
    bands_db = [growl_db, howl_db, rasp_db, fizz_db - 1.0, top_db]
    running = np.clip(1 - 2 * chugging, 0, 1)
    mix = exhaust(turns, chugging, dropped, clean, near, bands_db, rings_db)
    mix += drone(turns, dropped, running, near, tone_db, second_db)
    mix += breeze(growl_db) + throb(turns) + chugs() + pings()
    mix += swells(turns, dropped) + knock() + ticks()
    return mix[None]


MIC_DIP_HZ, MIC_DIP_WIDTH_HZ, MIC_DIP = 10370, 700, 0.49
EDGE_HZ = 15750


def record(dry):
    """The microphone cuts deep bass and dips in the treble; then the band limit of the recorder."""
    cut = signal.sosfilt(signal.butter(8, 35, "high", fs=SR, output="sos"), dry)
    b, a = signal.iirpeak(MIC_DIP_HZ, MIC_DIP_HZ / MIC_DIP_WIDTH_HZ, fs=SR)
    cut = cut - MIC_DIP * signal.lfilter(b, a, cut)
    band_limit = signal.firwin(1023, EDGE_HZ, window=("kaiser", 9), fs=SR)
    return signal.oaconvolve(cut, band_limit[None], "same")


dry = scene()
out = record(dry)
file_out(out)
```